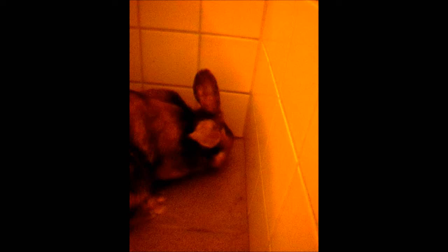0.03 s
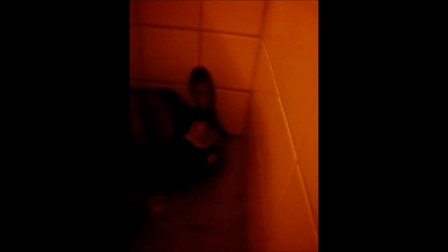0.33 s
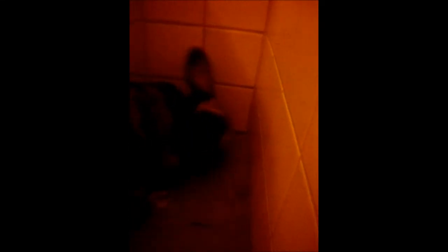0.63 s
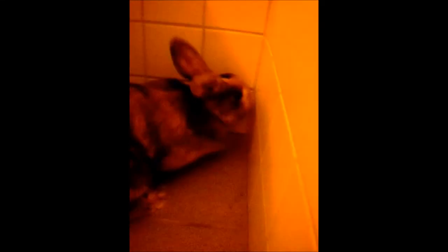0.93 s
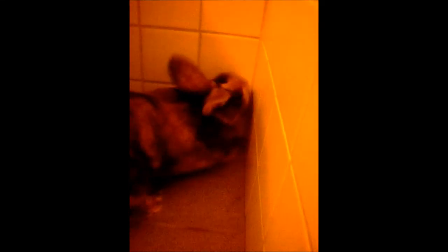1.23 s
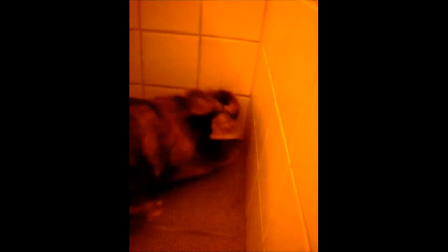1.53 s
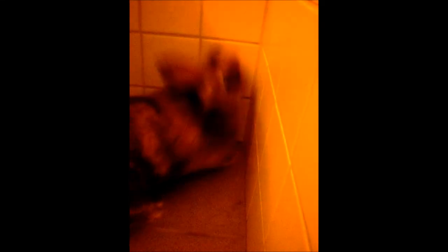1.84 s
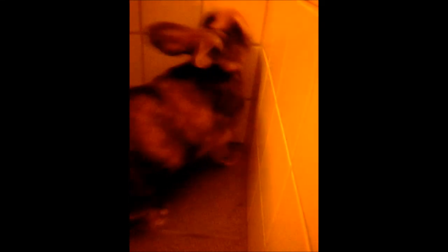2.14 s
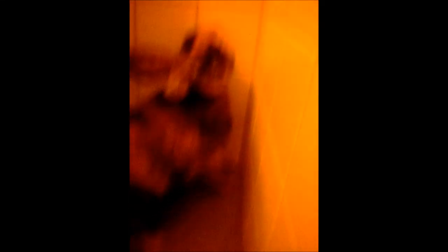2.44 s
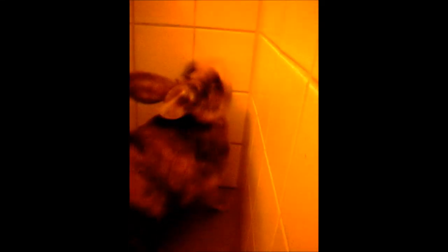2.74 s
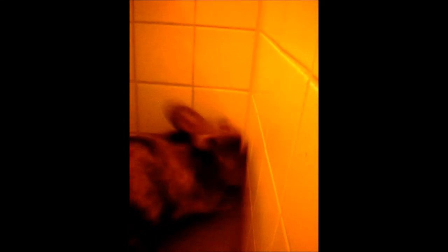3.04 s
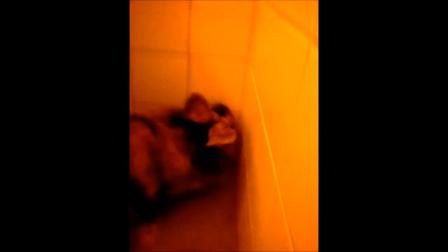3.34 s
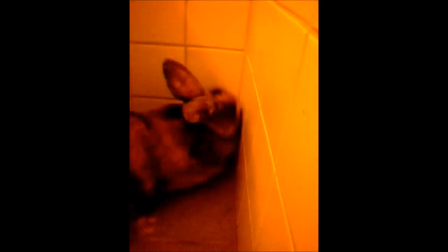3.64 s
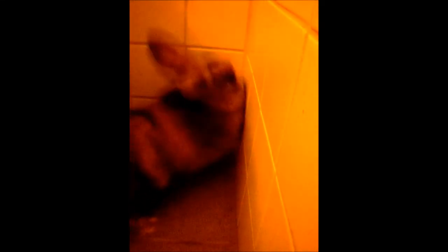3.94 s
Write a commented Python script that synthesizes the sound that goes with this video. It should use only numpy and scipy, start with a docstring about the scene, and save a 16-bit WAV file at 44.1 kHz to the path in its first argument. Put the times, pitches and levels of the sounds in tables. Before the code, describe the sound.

Two low thumps of a rabbit's feet on the floor, with handling clicks and hiss.

```python
"""A small tiled room, a pocket camera's microphone close to a rabbit on the floor.
The rabbit stamps twice, ringing the floor and setting the room booming, and shuffles softly.
The camera's input comes on with an electrical pop, and its case clicks three times in the hand.
A faint low hum wavers under steady hiss; the narrow-band recorder clips on the sharpest sounds."""
import sys
import numpy as np
from scipy import signal
from scipy.fft import irfft
from scipy.io import wavfile

SR = 44100
rng = np.random.default_rng(int(sys.argv[2]) if len(sys.argv) > 2 else 0)


def generate_wav(sig):
    """Save sig (samples, or channels by samples) to the path in sys.argv[1] as 16-bit PCM at SR."""
    pcm = np.round(np.clip(np.atleast_2d(sig).T, -1, 1) * 32767).astype(np.int16)
    wavfile.write(sys.argv[1], SR, pcm)


N = 176400
TIME = np.arange(N) / SR
POWER_ON_S, STUCK_S = .0757, .0101  # the input comes on, then sticks this long


def amp(db):
    """Decibels to gain."""
    return 10 ** (np.asarray(db) / 20)


def add(mix, s, sound):
    """Adds a sound to the mix, starting at s seconds."""
    part = mix[round(s * SR):][:len(sound)]
    part += sound[:len(part)]


def noise(spectrum, size):
    """Noise of rms 1 with a spectrum given as (f/Hz, level/dB) points."""
    hz, db = np.transpose(spectrum)
    f = np.fft.rfftfreq(size, 1 / SR)
    magnitude = amp(np.interp(np.log(f + 1), np.log(hz + 1), db))
    x = irfft(magnitude * np.exp(2j * np.pi * rng.random(len(f))), size)
    return x / x.std()


def low_pass(x, hz, taps):
    """Steep low-pass without delay."""
    return signal.oaconvolve(x, signal.firwin(taps, hz, window=("kaiser", 8), fs=SR), "same")


def hiss(level_db=-38.5):
    """The microphone's steady noise floor."""
    # hiss spectrum (f/Hz, relative level/dB)
    spectrum = [(12, -43.5), (20, -12.5), (91, -3), (118, -7), (144, -1), (176, -9), (210, -10),
                (311, -11.5), (340, -11.5), (472, -12.5), (515, -14.5), (854, -15.5), (2010, -21),
                (3400, -23), (3800, -26), (4940, -50.5), (8360, -120)]
    return amp(level_db) * noise(spectrum, N)


def glide(curve):
    """A sine that follows a curve of pitch and level."""
    s, hz, db = np.transpose(curve)
    cycles = np.cumsum(np.interp(TIME, s, hz)) / SR
    return amp(np.interp(TIME, s, db)) * np.sin(2 * np.pi * cycles)


def hum(flutter_depth=.15):
    """In the background, two nearly pure tones drift in pitch and level over a steady mains hum."""
    # wavering low tone (t/s, f/Hz, rms level/dB)
    low_tone = [(.1, 170, -40), (0.239, 169.3, -41), (.3, 167.6, -35), (.52, 165, -47), (.65, 162, -40),
                (.78, 161.9, -32), (.89, 154, -25), (.93, 154.6, -31.5), (.975, 146, -44),
                (1.089, 141, -25.5), (1.16, 140, -44.5), (1.33, 145, -56), (1.42, 157, -33.5),
                (1.56, 158, -37), (1.8, 145.1, -43.5), (2.33, 155, -49.5), (2.42, 157, -32.5),
                (2.6, 146, -59), (4, 143, -42)]
    # fainter, higher tone (t/s, f/Hz, rms level/dB)
    whine = [(.6, 440, -68), (.75, 431, -50.5), (.93, 410, -50), (1.1, 402, -54), (1.27, 403, -47),
             (1.45, 392, -54.5), (1.7, 390, -76)]
    # mains hum partials (f/Hz, rms level/dB)
    partials = [(52, -50.5), (103, -54.5)]
    mains = sum(amp(db) * np.sin(2 * np.pi * (hz * TIME + rng.random())) for hz, db in partials)
    flutter = 1 + flutter_depth * noise([(1, 0), (12, 0), (40, -40), (200, -100)], N)
    return np.sqrt(2) * ((glide(low_tone) + glide(whine)) * flutter + mains)


def power_pop(recover_s=.0023, offset=.14, fade_s=.57, snap_db=2, snap_hz=3400, snap_s=.0002):
    """The input snaps on, sticks at its lower limit, then recovers through a slowly fading offset."""
    t = TIME - POWER_ON_S
    since_release = np.maximum(t - STUCK_S, 0)
    stuck = np.exp(-since_release / recover_s)
    drift = offset * np.exp(-since_release / fade_s)
    step = (t > 0) * (drift * (1 - stuck) - stuck)
    snap = amp(snap_db) * np.exp(-abs(t) / snap_s) * np.sin(2 * np.pi * snap_hz * t)
    return step - snap


def case_ring(t, pitch, tilt_db, focus_hz, focus_db=5.5, focus_octaves=.27):
    """The struck shell rings down; the point of contact favours the modes near one frequency."""
    # camera case modes (f/Hz, level/dB, t60/s)
    modes = [(530, -21, .06), (818, -6.5, 0.013), (1189, -9.5, 0.018), (1550, -15, 0.023),
             (1882, -4.5, 0.023), (2386, -9.5, .019), (2850, -6.5, 0.014), (3580, -10.5, 0.012)]
    hz, db, t60 = np.transpose(modes)[:, :, None]
    tilt = tilt_db * np.log2(hz / hz[len(hz) // 2])
    focus = focus_db * np.exp(-(np.log2(hz * pitch / focus_hz) / focus_octaves) ** 2)
    polarity = (-1) ** np.arange(len(hz))
    return polarity @ (amp(db + tilt + focus - 60 * t / t60) * np.sin(2 * np.pi * hz * pitch * t))


def camera_case(hardest_click_s=.561):
    """Right at the microphone, quick ticks ring the plastic case, each with a short rattle."""
    # case ticks, a few to a click (t/s, level/dB, pitch factor, tilt/dB per octave, most struck f/Hz)
    ticks = [(.1569, -15.5, 1.02, -6, 537), (0.1623, -10.5, 0.9, 1, 1430), (.164, -11.5, 0.97, 5, 2820),
             (.1683, -21, .97, -7.5, 488), (.17316, -19.5, .89, 1, 1600), (0.56, 3.5, .99, 0, 916),
             (.5612, -2, 1.157, 2, 2200), (0.8887, -14, 1, -1, 2900), (.8931, -20, 1.018, 10, 1930),
             (0.8947, -3.5, 1.024, -3, 1540), (.89867, -16, 1, 4, 1690)]
    # spectrum of the jolt to the microphone (f/Hz, relative level/dB)
    jolt = [(40, -12.5), (180, -5), (360, -3), (480, -31), (1200, -39)]
    out, t = np.zeros(N), TIME[:SR // 4]

    def decay(db, t60_s):
        return amp(db - 60 * t / t60_s)

    for s, db, pitch, tilt_db, focus_hz in ticks:
        rattle = rng.standard_normal(len(t)) * decay(db=-17.5, t60_s=.0402)
        add(out, s, amp(db) * (case_ring(t, pitch, tilt_db, focus_hz) + rattle))
    # the hardest click leaves a small part ringing and jolts the microphone
    ping = decay(db=-37, t60_s=.38) * np.sin(2 * np.pi * 2135 * t)
    knock = decay(db=-11, t60_s=.045) * noise(jolt, len(t))
    add(out, hardest_click_s, ping + knock)
    return out


def thud(modes, t, pitch, build_cycles):
    """Modes pushed by a soft blow: each builds up over some cycles, then dies."""
    out = np.zeros(len(t))
    for hz, db, t60 in modes:
        build = 1 - np.exp(-hz * t / build_cycles)
        out += build * amp(db - 60 * t / t60) * np.sin(2 * np.pi * hz * pitch * t)
    return out


def swell(t, length):
    """A soft rise to 1 and a longer fall."""
    u = 3 * t / length
    return u * np.exp(1 - u)


def rabbit(boom_db=-16, boom_t60_s=.45, boom_rise_s=.01, low_cut_hz=74):
    """Close by, stamps ring the floor and boom in the room; steps and brushes are soft and brief."""
    # hind-foot stamps (t/s, level/dB, pitch factor, relative room level/dB)
    stamps = [(1.5680, 0, 0.98, -3.5), (3.4603, -1.5, 0.94, -1)]
    # floor modes (f/Hz, level/dB, t60/s)
    floor_modes = [(97, -13, 0.22), (138.6, -14, .17), (159.55, -11.5, .16), (192, -10.5, .12),
                   (210.2, 2, .09), (241.6, -11, 0.086), (259.8, -15, 0.13), (352.4, -19, .09),
                   (438, -20.5, 0.1), (509, -18.5, 0.074), (588, -26, 0.064)]
    # low room modes that ring on after a stamp (f/Hz, level/dB, t60/s)
    room_modes = [(113.9, -8.5, 0.5), (185.7, -13.5, 0.51), (206.5, -15, .38), (255, -20.5, 0.25)]
    # spectrum of the room's boom and of the footfalls (f/Hz, relative level/dB)
    boom_spectrum = [(40, -36), (80, -12), (110, 1), (200, -1.5), (270, -5.5), (340, -18), (600, -17.5),
                     (850, -29), (1500, -36), (4000, -56)]
    # soft footfalls as the rabbit settles or shifts (t/s, level/dB, length/s)
    steps = [(1.622, -21, 0.049), (1.69, -34.5, 0.051), (2.166, -30, 0.025), (2.192, -33, 0.038),
             (2.383, -43, 0.022), (3.548, -32, .025), (3.612, -29.5, .04), (3.955, -30.5, 0.037)]
    # fur and claws brushing the floor (t/s, level/dB, length/s)
    brushes = [(1.622, -42.5, .035), (3.47, -41, 0.047), (3.612, -41, 0.062)]
    # spectrum of that brushing (f/Hz, relative level/dB)
    brush_spectrum = [(200, -13.5), (600, -4.5), (900, 1), (1250, 1.5), (1700, -17), (2700, -6.5),
                      (4000, -23.5)]
    out, t = np.zeros(N), TIME[:SR // 2]
    boom_envelope = (1 - np.exp(-t / boom_rise_s)) * amp(boom_db - 60 * t / boom_t60_s)
    for s, db, pitch, room_db in stamps:
        floor = thud(floor_modes, t, pitch, build_cycles=.94)
        boom = boom_envelope * noise(boom_spectrum, len(t))
        room = boom + thud(room_modes, t, pitch, build_cycles=15)
        add(out, s, amp(db) * (floor + amp(room_db) * room))
    for touches, spectrum in (steps, boom_spectrum), (brushes, brush_spectrum):
        for s, db, length in touches:
            add(out, s, amp(db) * swell(t, length) * noise(spectrum, len(t)))
    return signal.sosfilt(signal.butter(2, low_cut_hz, "highpass", fs=SR, output="sos"), out)


def scene():
    """The pop, then everything the one microphone picks up once it is live."""
    live = TIME > POWER_ON_S + STUCK_S
    return (live * (rabbit() + camera_case() + hum() + hiss()) + power_pop())[None]


def record(dry):
    """The camera's recorder: a telephone-wide band, hard clipping at full scale, then a top cut."""
    narrow = low_pass(dry[0], hz=3900, taps=401)
    clipped = np.clip(narrow, -1, 1)
    return low_pass(clipped, hz=16270, taps=255)[None]


dry = scene()
out = record(dry)
generate_wav(out)
```